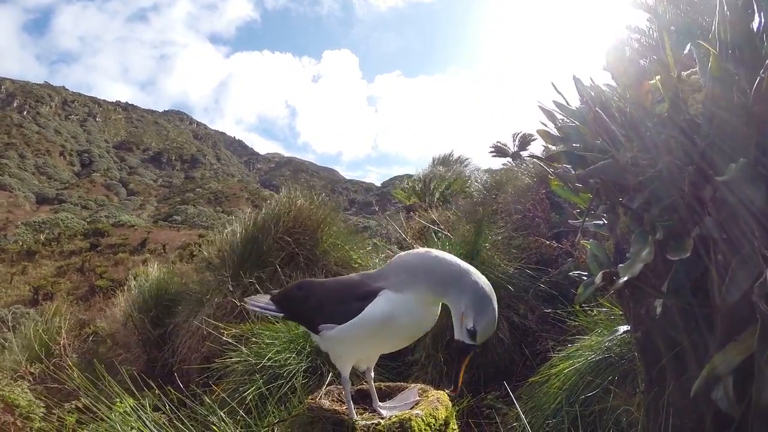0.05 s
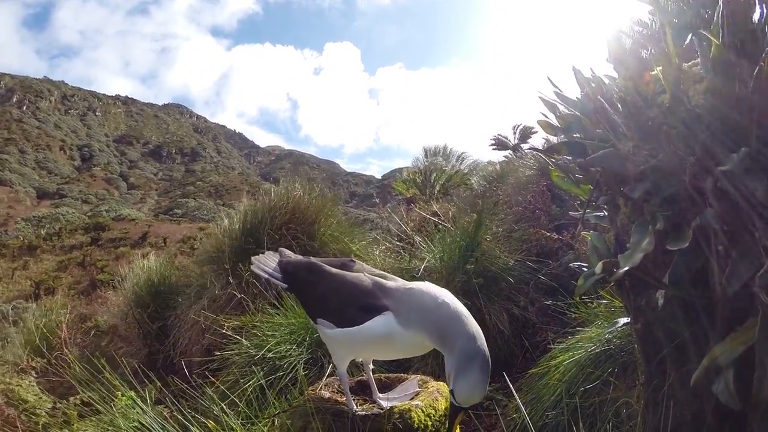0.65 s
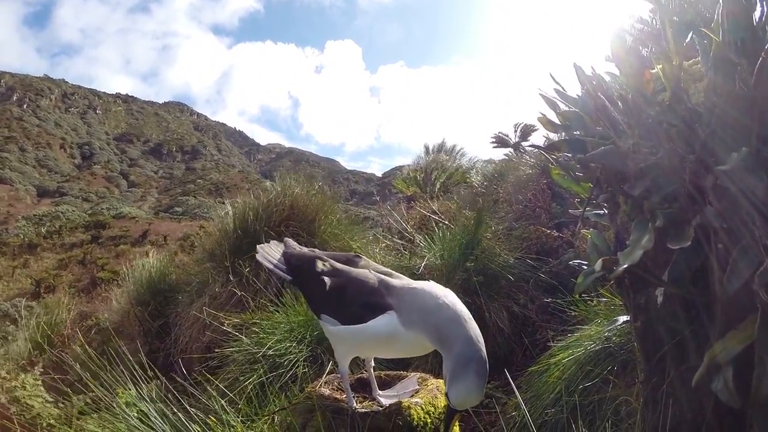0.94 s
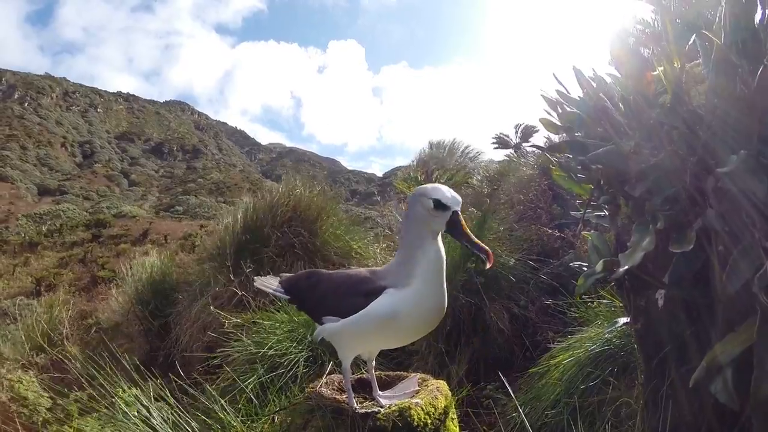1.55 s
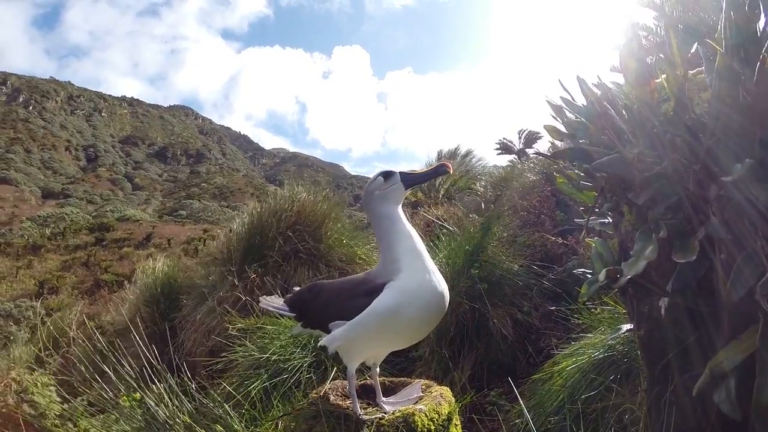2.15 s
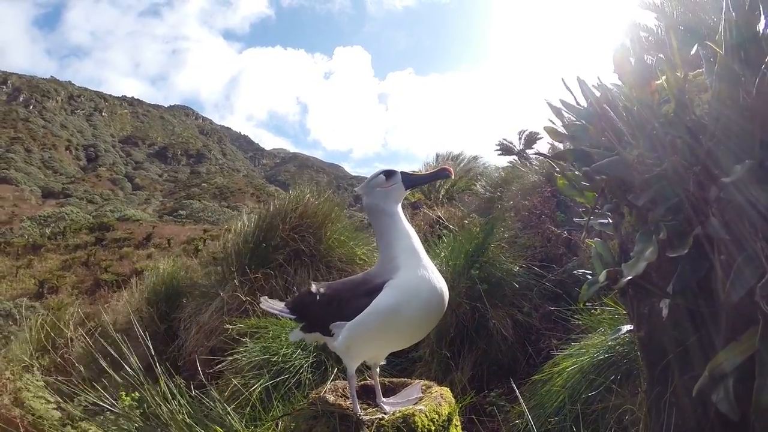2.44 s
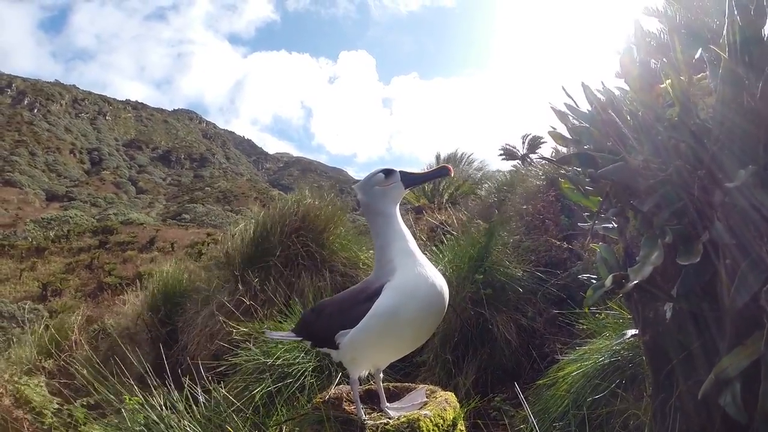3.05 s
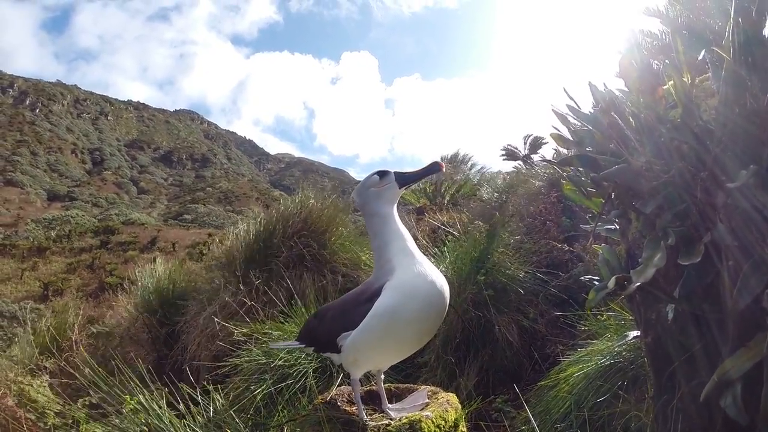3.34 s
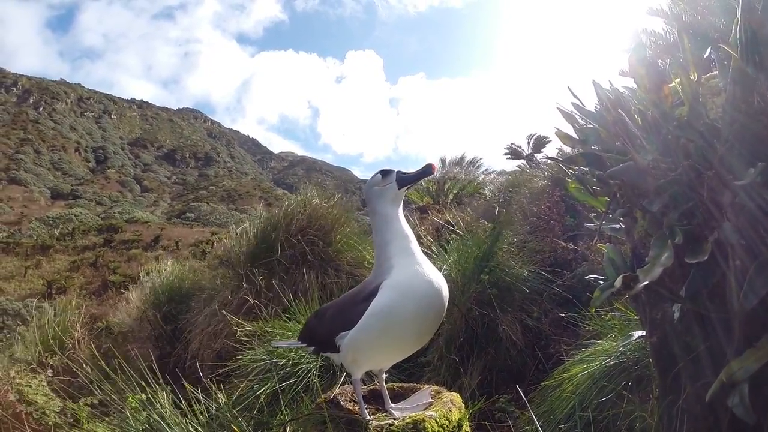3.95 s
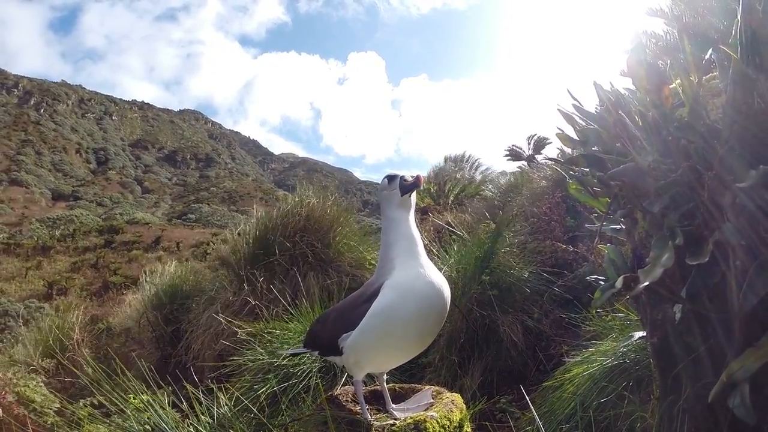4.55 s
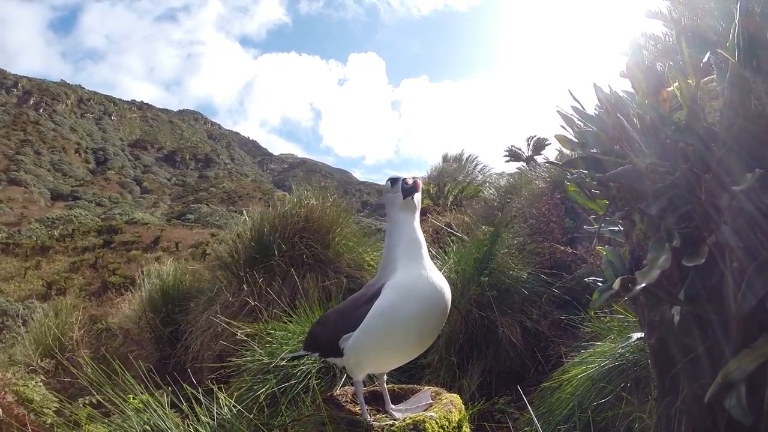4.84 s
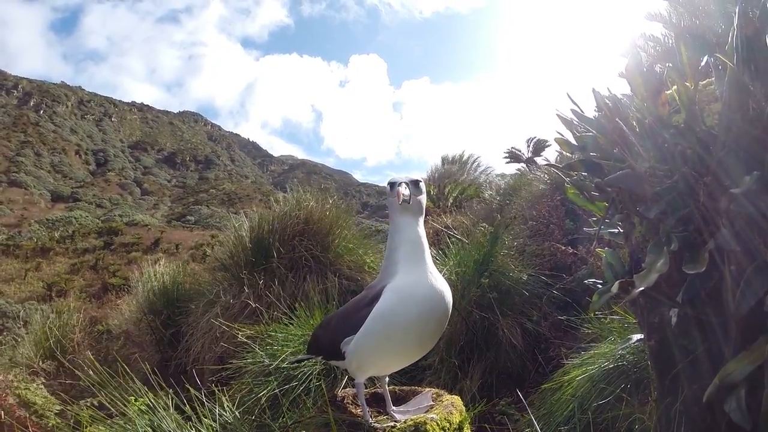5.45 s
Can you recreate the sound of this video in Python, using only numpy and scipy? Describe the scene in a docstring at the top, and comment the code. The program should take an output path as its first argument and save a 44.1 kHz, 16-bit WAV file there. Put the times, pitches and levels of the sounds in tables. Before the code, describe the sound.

On an open grassy hillside, a nearby seabird starts at once with a rapid series of ten shrill, raspy calls, each a tiny burst of clicks and squeaks. Soft clucks fall between the first few. After roughly two seconds it stops, leaving a faint breeze with occasional low puffs on the microphone, a barely audible camera whine and a few distant peeps.

```python
"""An albatross on its nest gives ten harsh, rattling calls, first bowed low, then with its neck stretched up.
Each call is a quick run of pulses: a shrill pip from the syrinx (the bird's voice box) and a snap
that rings in the throat. A few duller clucks fall between the early calls.
Behind it, light wind buffets the microphone, small birds peep far off and a camera whines faintly."""
import sys
import numpy as np
from scipy import signal
from scipy.fft import rfft, irfft
from scipy.io import wavfile
from scipy.ndimage import uniform_filter1d

SR = 44100
rng = np.random.default_rng(int(sys.argv[2]) if len(sys.argv) > 2 else 0)


def unload_wav(signal):
    """Save mono or channel-first audio to the path in sys.argv[1] as 16-bit WAV at rate SR, clipped to [-1, 1]."""
    wavfile.write(
        sys.argv[1],
        SR,
        np.round(np.clip(np.atleast_2d(signal).T, -1, 1) * 32767).astype(np.int16),
    )


N = 250929
TIME = np.arange(N) / SR
SHORT_TIME = np.arange(SR // 8) / SR  # the clock for one short sound, in seconds

# How the bird rises from its bow: time_s, stretch (0 is bowed, 1 is fully stretched)
NECK_STRETCH = [(.98, .07), (1.23, .53), (1.41, 0.61), (1.61, 0.93), (2.07, 1.0)]
# One row for each call. The extra wait is the one before its last pulse.
# start_s, pulse_count, cycle_s, extra_wait_s, pitch_hz, pitch_bend (a share), pip_db, snap_db
CALLS = [ (-.0008, 10, 0.0051, 0.0035, 4326, .17, -23.5, -23),
         (0.2401, 10, 0.0046, 0.0027, 4315, 0.14, -27, -23.5),
         (0.4922, 10, 0.0051, .0055, 4344, 0.27, -21.5, -22.5),
         (.7359, 10, .005, 0.0034, 4415, 0.11, -19, -23.5), (0.9785, 9, 0.005, 0.0021, 4410, 0.1, -23, -25),
         (1.2317, 6, 0.0062, .0019, 4226, 0.057, -21.5, -24),
         (1.4119, 6, 0.0061, .0034, 4160, 0.099, -22.5, -21.5),
         (1.6145, 6, 0.0058, 0.002377, 4190, 0.22, -21, -22),
         (1.8212, 5, .0064, 0.0045, 4250, 0.17, -23, -24.5),
         (2.0700, 4, 0.0064, 0.0027, 4264, 0.066, -22, -26)]
def albatross_calls():
    """The bird calls again and again, and its posture colours each call."""
    out = np.zeros(N)
    for start_s, *settings in CALLS:
        stretch = np.interp(start_s, *np.transpose(NECK_STRETCH))
        add(out, start_s, one_call(*settings, stretch))
    return out


def one_call(pulse_count, cycle_s, extra_wait_s, pitch_hz, pitch_bend, pip_db, snap_db, stretch,
             slowing=.38, push_db=7, fade_s=.005, jitter_s=.0001, resonance_hz=4350):
    """Air pressure rises and falls: the pitch arches, the pulses slow, and the last is mostly a snap."""
    count = int(round(pulse_count))
    chance = rng.standard_normal((12, 4))[:count]
    air, shake = rng.standard_normal((2, len(SHORT_TIME)))
    flutter = .026 * rms_one(cut(shake, 900, "low"))
    gaps_s = cycle_s + extra_wait_s * slowing ** np.arange(count - 1)[::-1]
    starts_s = np.append(0, np.cumsum(gaps_s))
    air_left = np.exp(-np.append(0, gaps_s - cycle_s) / fade_s)  # a late pulse is a weak one
    pressure = np.interp(starts_s / starts_s[-1], [0, .35, 1], [.5, 1, 0])
    push = pressure - .6  # how far above the average pressure
    pips_db = pip_db + push_db * push
    pips_db[[0, -1]] += [-5, 2]  # the first and last pips
    snaps_db = snap_db - 3 * pressure
    snaps_db[-1] += 6
    overtone_db = np.interp(stretch ** 10, [0, 1], [-31, -21.5])  # grows only near full stretch
    pips, snaps = 0, 0
    for k, (late, loud, sharp, hard) in enumerate(chance):
        t = SHORT_TIME - max(starts_s[k] + jitter_s * late, 0)
        hz = pitch_hz * (1 + pitch_bend * push[k] + .0068 * sharp)
        in_tune = 1 / np.hypot(1, (hz - resonance_hz) / 600)  # pips off the resonance are weaker
        pip_gain = air_left[k] ** 2 * in_tune * from_db(pips_db[k] - .35 * loud)
        pips += pip_gain * pip(t, hz, overtone_db, flutter)
        snaps += air_left[k] * from_db(snaps_db[k] + hard) * snap(t, air)
    return ground_echo(windpipe(pips, stretch) + throat(snaps, stretch), stretch)


def pip(t, hz, overtone_db, flutter, peak_s=.0012, ring_s=.0028, sag=.15, sag_s=.0075):
    """The voice box's membranes whistle while open: the tone swells, sags in pitch and rings away."""
    t = np.maximum(t, 0)
    swell = (t / peak_s * np.exp(1 - t / peak_s)) ** 3
    ring = from_db(-12) * (1 - np.exp(-t / peak_s)) * np.exp(-t / ring_s)
    glide = 1 + sag * np.tanh((peak_s - t) / sag_s) + flutter
    phase = 2 * np.pi * np.cumsum(hz * glide * (t > 0)) / SR
    overtones = np.sin(2 * phase) + from_db(-19) * np.sin(3 * phase)
    return (swell + ring) * (np.sin(phase) + from_db(overtone_db) * overtones)


def windpipe(pips, stretch, lag_s=.000736):
    """Whatever its pitch, each pip leaves the windpipe ringing a moment later."""
    ring_hz = np.interp(stretch, [0, 1], [4130, 3980])
    ring = resonate(pips, ring_hz, width_hz=360)
    return from_db(2) * (pips + from_db(-5) * delay(ring, lag_s))


def snap(t, noise, puff_s=.0024):
    """The membranes part with a click and a puff of air; t counts from that moment."""
    click = np.diff(t >= 0, prepend=False).astype(float)
    puff = .11 * noise * (t >= 0) * np.exp(-np.maximum(t, 0) / puff_s)
    return from_db(3) * cut(click + puff, 7500, "low")


# The pitches at which the throat and bill ring: bowed_hz, stretched_hz, width_hz, bowed_db, stretched_db
THROAT_RINGS = [ (218, 180, 250, -15, -13.5), (727, 481, 420, -16.5, -14.5), (1157, 390, 1250, -15, -25),
                (1878, 1754, 203, -5.5, -1), (2364, 2500, 133, 2.5, 6.5), (2910, 3100, 244, 6.5, 8),
                (3500, 3740, 106, 9, 14), (3990, 4100, 470, 6.5, 9.5), (4860, 5560, 515, -4.5, -11),
                (5730, 5800, 290, -11.5, -25), (6700, 7500, 420, -15.5, -7.5), (9700, 8700, 400, -8.5, -17),
                (11920, 11500, 960, -16.5, -18)]
def throat(snaps, stretch, bowed_treble_db=-6.5, stretched_treble_db=-1.5, gain_db=17):
    """Snaps ring in the throat. Stretching shifts the rings, and an open bill lifts the high ones."""
    treble_db = np.interp(stretch, [0, 1], [bowed_treble_db, stretched_treble_db])
    out = 0
    for bowed_hz, stretched_hz, width_hz, bowed_db, stretched_db in THROAT_RINGS:
        hz = bowed_hz + stretch * (stretched_hz - bowed_hz)
        level_db = bowed_db + stretch * (stretched_db - bowed_db)
        tilt_db = treble_db * np.tanh(2 * np.log(hz / 4500) + 1)
        ring = resonate(snaps, hz, width_hz)
        ring = resonate(ring, hz, 1.8 * width_hz)  # keeps the pitches between the rings quiet
        out += from_db(level_db + tilt_db + gain_db) * ring
    return out


# Single throat clicks between the calls: start_s, level_db, ring_hz
THROAT_CLUCKS = [(0.1937, -24.5, 2960), (.204, -24, 2890), (.2238, -40, 3020), (.4327, -22, 3200),
                 (0.4449, -23, 3250), (0.6938, -24.5, 3160)]
def albatross_clucks():
    """Each dull click passes through the bowed throat and rings briefly in the closed bill."""
    out = np.zeros(N)
    for start_s, level_db, ring_hz in THROAT_CLUCKS:
        air = rng.standard_normal(len(SHORT_TIME))
        click = cut(snap(SHORT_TIME, air), 4200, "low")
        bill_ring = from_db(22.5) * resonate(click, ring_hz, width_hz=240)
        cluck = throat(click, stretch=0, bowed_treble_db=-3) + bill_ring
        add(out, start_s, from_db(level_db) * ground_echo(cluck, stretch=0))
    return out


def ground_echo(sound, stretch):
    """The sound also bounces off the ground, arriving later when the head is high."""
    delay_s = np.interp(stretch, [0, 1], [.001162, .0018])
    return sound + from_db(-9.5) * delay(sound, delay_s)


def grass_scatter(sound, fade_s=.05):
    """Tufts of grass scatter the sound and give it a faint, short tail."""
    tail = rng.standard_normal(len(SHORT_TIME)) * from_db(-60 * SHORT_TIME / fade_s)
    tail /= np.linalg.norm(tail)
    return sound + from_db(-27) * signal.fftconvolve(sound, tail)[:N]


# The tone colour of the wind on the microphone: pitch_hz, level_db
RUMBLE_COLOUR = [(8.8, -29), (15, 8), (48, 4.5), (102, -6.5), (200, -14.5), (260, -46), (440, -120)]
# How the breeze swells and eases: time_s, level_db
BREEZE_LEVELS = [(0, -55.5), (1.0, -56.5), (1.6, -56.5), (1.9, -58.5), (2.35, -52), (2.65, -57.5),
                 (4.3, -57.5), (5.2, -61.5), (5.69, -56.5)]
def wind_rumble(gust_db=1.5, gusts_per_s=7.6):
    """Wind rumbles on the microphone, with random gusts on top of the slow breeze."""
    rumble = coloured_noise(RUMBLE_COLOUR)
    rumble /= np.sqrt(uniform_filter1d(rumble ** 2, size=SR // 12) + 1e-9)  # even out its own swells
    level_db = np.interp(TIME, *np.transpose(BREEZE_LEVELS)) + gust_db * drift(gusts_per_s)
    return from_db(level_db) * rumble


# Sudden puffs of wind: start_s, level_db, pitch_hz
WIND_SLAPS = [(.466, -32.5, 119), (.768, -33.5, 79), (1.526, -36.5, 56), (4.169, -36.5, 151),
              (4.29, -44, 48), (4.871, -33, 107), (4.94, -37.5, 48)]
def wind_slaps(fade_per_cycle=2.85):
    """Each puff hits the microphone with a low thump that dies almost at once."""
    out = np.zeros(N)
    for start_s, level_db, pitch_hz in WIND_SLAPS:
        cycles = SHORT_TIME * pitch_hz
        thump = np.sin(2 * np.pi * cycles) * np.exp(-fade_per_cycle * cycles)
        add(out, start_s, from_db(level_db) * cut(thump, 350, "low"))
    return out


# The tone colour of the moving air: pitch_hz, level_db
AIR_COLOUR = [(59, -51), (100, -11.5), (146, -8.5), (228, -5.5), (326, -6.5), (467, -8.5), (1330, -14),
              (1550, -12.5), (2260, -16), (2500, -16), (6000, -24), (7800, -34.5), (13200, -120)]
def hillside_air():
    """Air flows over the hillside with a soft, steady hiss."""
    return from_db(-61.5) * coloured_noise(AIR_COLOUR)


# Peeps from small birds: start_s, length_s, start_hz, end_hz, level_db
BIRD_PEEPS = [(0.154, 0.031, 1800, 2400, -58), (5.441, 0.013, 3200, 2920, -54.5),
              (5.525, .023, 2550, 3240, -60), (5.535, .03, 4200, 4800, -66), (5.616, .038, 2400, 3220, -63)]
def far_birds(waver=.027):
    """Thin, gliding peeps waver in the wind."""
    out = np.zeros(N)
    for start_s, length_s, start_hz, end_hz, level_db in BIRD_PEEPS:
        hz = np.interp(SHORT_TIME, [0, length_s], [start_hz, end_hz])
        hz *= 1 + waver * drift(490)[:len(SHORT_TIME)]
        tone = np.sin(2 * np.pi * np.cumsum(hz) / SR)
        add(out, start_s, from_db(level_db) * arch(SHORT_TIME, length_s) ** 2 * tone)
    return out


# Two short moves of the camera's lens: start_s, length_s, pitch_hz
LENS_MOVES = [(2.287, 0.095, 3230), (3.024, 0.1, 3210)]
# The tones in the motor's whine: pitch_multiple, level_db
MOTOR_TONES = [(1, -73), (2, -68), (3, -72.5), (4, -71)]
def lens_motor(wobble=.0083, end_rise=.044):
    """A tiny motor whines, running a little faster at both ends of a move."""
    out = np.zeros(N)
    for start_s, length_s, pitch_hz in LENS_MOVES:
        load = arch(TIME - start_s, length_s) ** .5
        speed = 1 + end_rise * (1 - load) ** 2 + wobble * drift(400)
        phase = 2 * np.pi * np.cumsum(pitch_hz * speed) / SR
        for multiple, level_db in MOTOR_TONES:
            out += load * from_db(level_db) * np.sin(round(multiple) * phase)
    return out


# The tone colour of the microphone's hiss: pitch_hz, level_db
HISS_COLOUR = [(5000, -30), (6500, -2), (7500, -3), (10000, -3), (11500, -6.5), (13000, -10), (14000, -9.5),
               (15200, -6)]
# The tones of an electrical whistle: pitch_hz, level_db
WHISTLE_TONES = [(10644, -77.5), (10693, -88)]
def camera_electronics():
    """The microphone hisses faintly under a steady, high electrical whistle."""
    out = from_db(-74) * coloured_noise(HISS_COLOUR)
    for pitch_hz, level_db in WHISTLE_TONES:
        out += from_db(level_db) * np.sqrt(2) * np.sin(2 * np.pi * pitch_hz * TIME)
    return out


def from_db(db):
    """Turn decibels into a number to multiply by."""
    return 10 ** (np.asarray(db) / 20)


def rms_one(x):
    """Scale a sound so its average strength (rms) is 1."""
    return x / np.sqrt(np.mean(x ** 2) + 1e-20)


def add(track, start_s, sound):
    """Mix a sound into a track at the given time."""
    at = int(round(start_s * SR))
    sound, at = sound[max(-at, 0):], max(at, 0)
    track[at:at + len(sound)] += sound[:N - at]


def delay(sound, delay_s):
    """Make a short sound arrive later."""
    return np.interp(SHORT_TIME - delay_s, SHORT_TIME, sound, left=0)


def cut(x, hz, keep):
    """Keep the "low" or "high" side of hz and fade the other."""
    return signal.sosfilt(signal.butter(2, hz, keep, fs=SR, output="sos"), x)


def resonate(x, hz, width_hz):
    """Let a sound ring at one pitch; a narrower width rings longer."""
    r = np.exp(-np.pi * width_hz / SR)
    feed_in = np.array([1, 0, -1]) * (1 - r * r) / 2
    feedback = [1, -2 * r * np.cos(2 * np.pi * hz / SR), r * r]
    return signal.lfilter(feed_in, feedback, x + 1e-18)


def drift(turns_per_s):
    """A line that wanders at random around zero."""
    points = rng.standard_normal(4096)
    return np.interp(TIME * turns_per_s, np.arange(len(points)), points)


def coloured_noise(colour):
    """Noise of strength 1, with its lows and highs balanced by a colour table."""
    hz, level_db = np.transpose(colour)
    all_hz = np.maximum(np.fft.rfftfreq(N, 1 / SR), 1)
    gains = from_db(np.interp(np.log(all_hz), np.log(hz), level_db))
    return rms_one(irfft(rfft(rng.standard_normal(N)) * gains, N))


def arch(t, length_s):
    """One smooth rise and fall, silent before and after."""
    return np.sin(np.pi * np.clip(t / length_s, 0, 1))


def scene():
    """The albatross and everything behind it reach one microphone."""
    albatross = grass_scatter(albatross_calls() + albatross_clucks())
    wind = wind_rumble() + wind_slaps() + hillside_air()
    return (albatross + wind + far_birds() + camera_electronics() + lens_motor())[None]


def record(dry, cutoff_hz=15350):
    """The very highest treble is cut off steeply."""
    return signal.sosfilt(signal.ellip(10, .1, 80, cutoff_hz, fs=SR, output="sos"), dry)


dry = scene()
out = record(dry)
unload_wav(out)
```